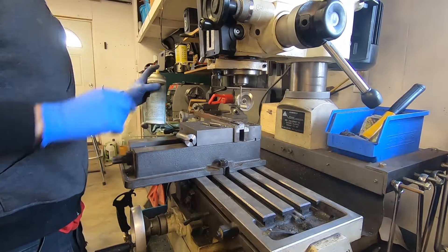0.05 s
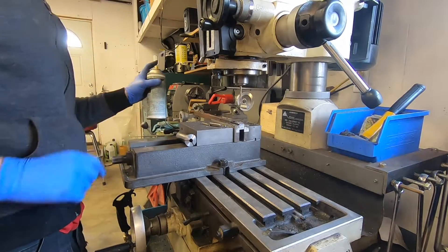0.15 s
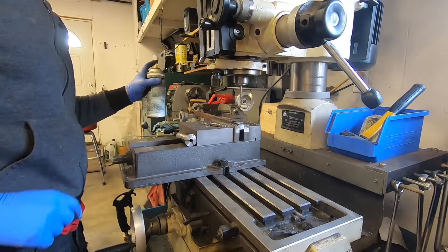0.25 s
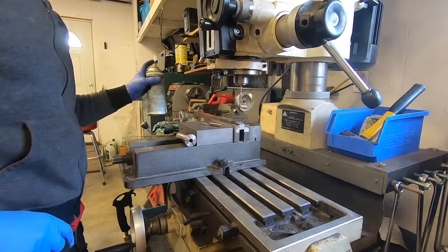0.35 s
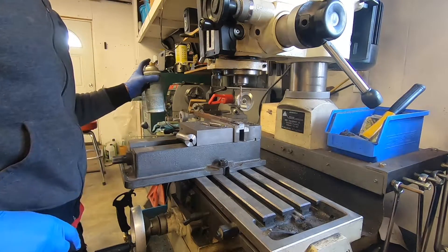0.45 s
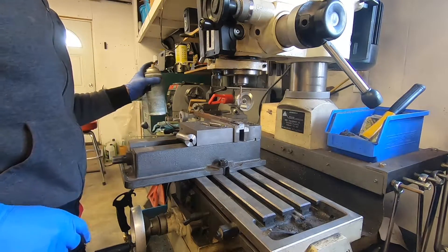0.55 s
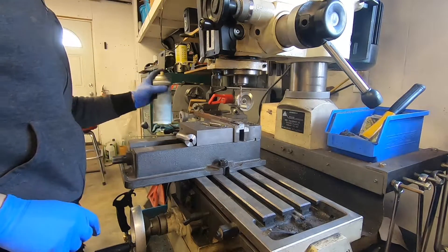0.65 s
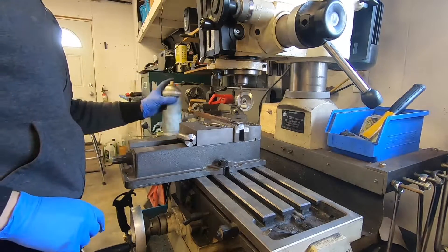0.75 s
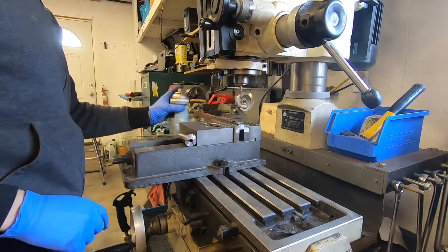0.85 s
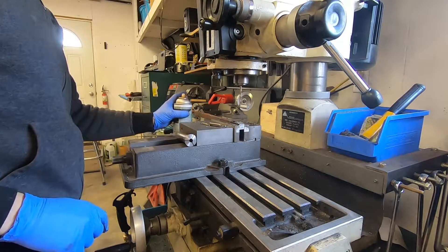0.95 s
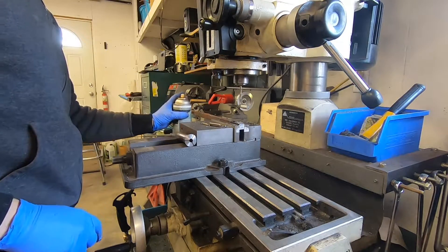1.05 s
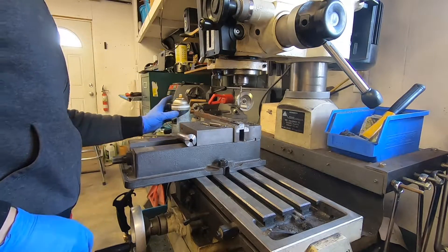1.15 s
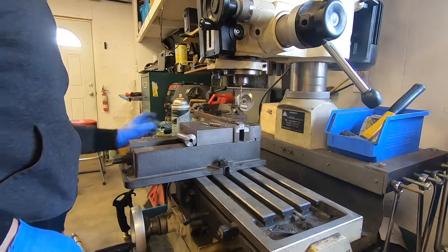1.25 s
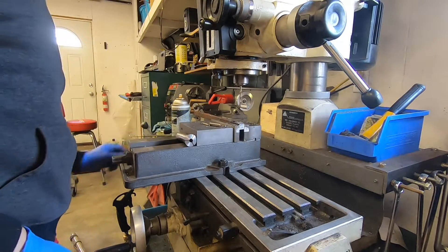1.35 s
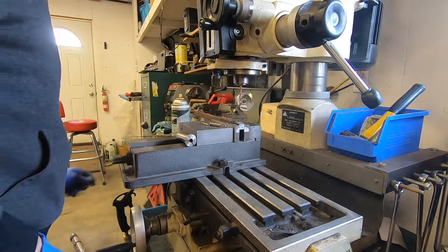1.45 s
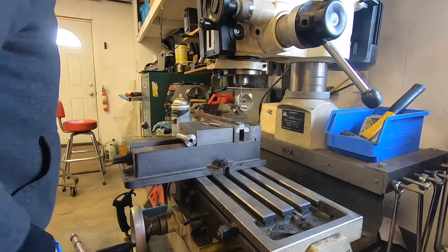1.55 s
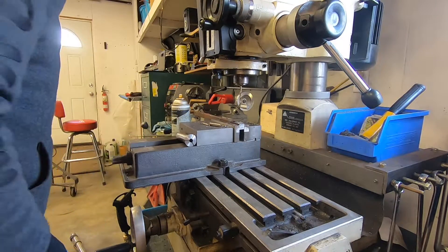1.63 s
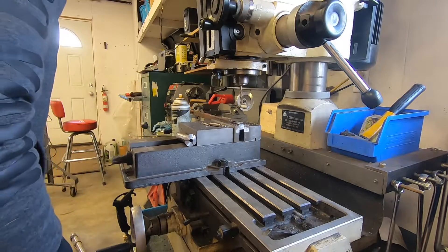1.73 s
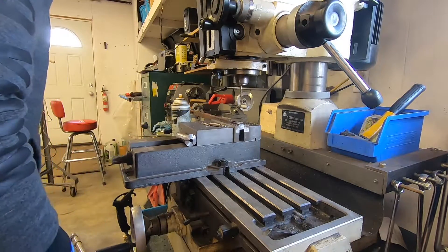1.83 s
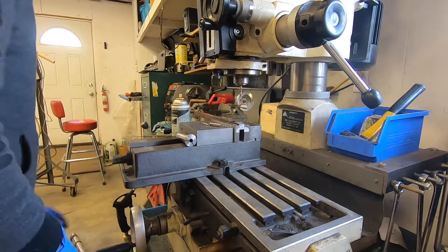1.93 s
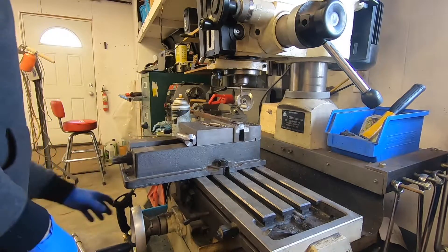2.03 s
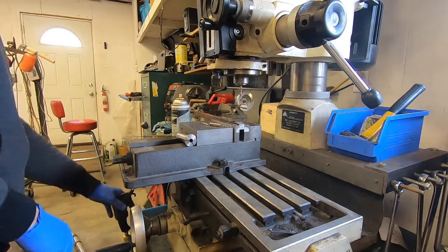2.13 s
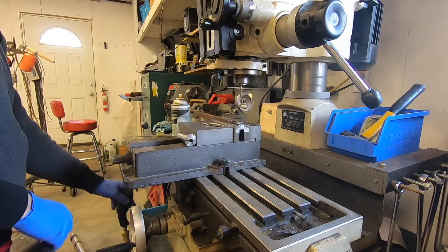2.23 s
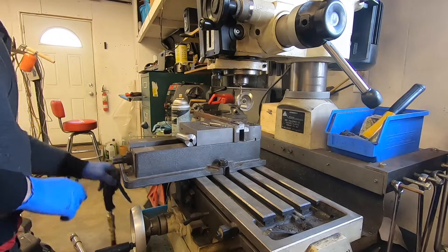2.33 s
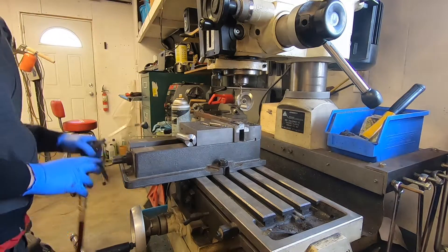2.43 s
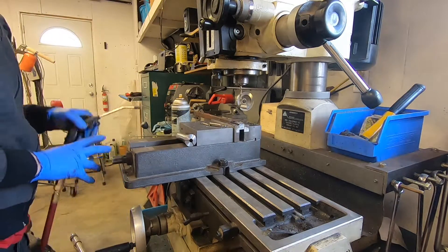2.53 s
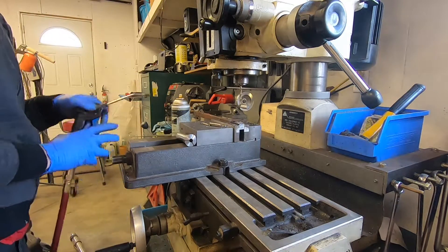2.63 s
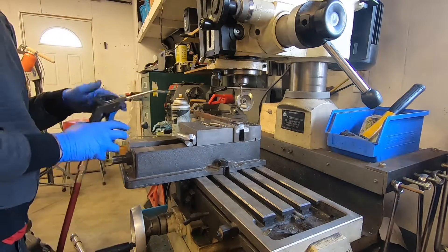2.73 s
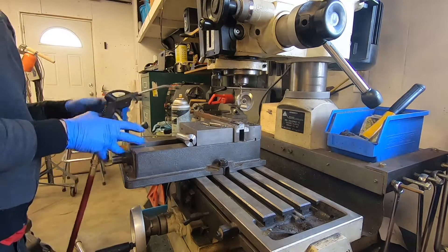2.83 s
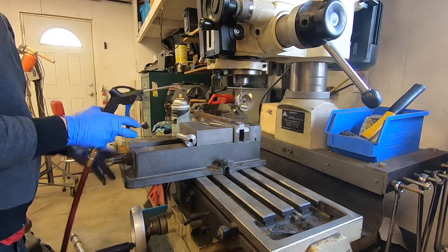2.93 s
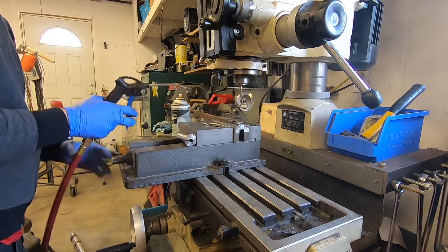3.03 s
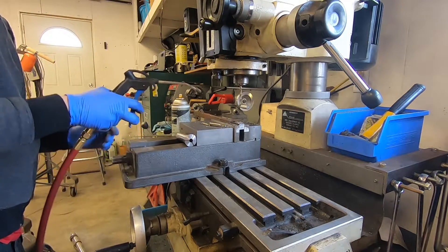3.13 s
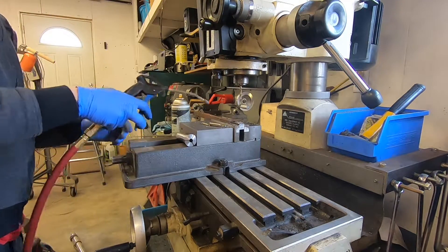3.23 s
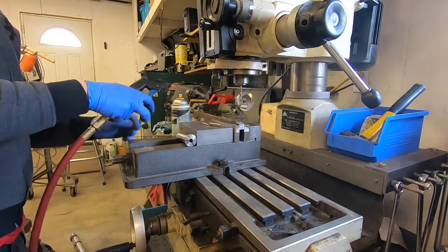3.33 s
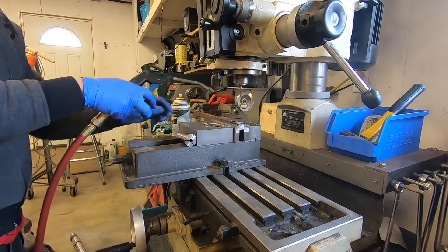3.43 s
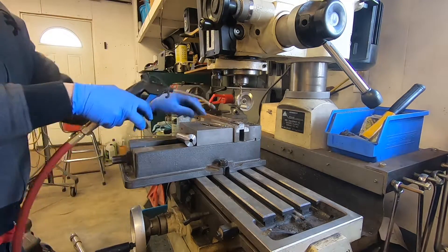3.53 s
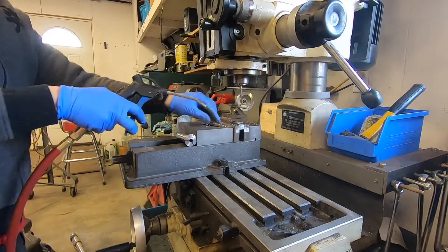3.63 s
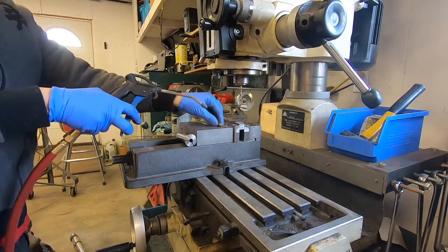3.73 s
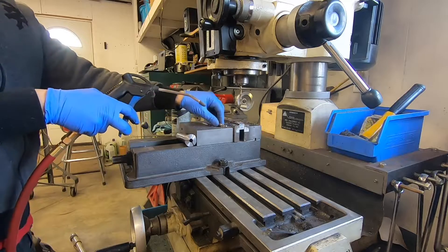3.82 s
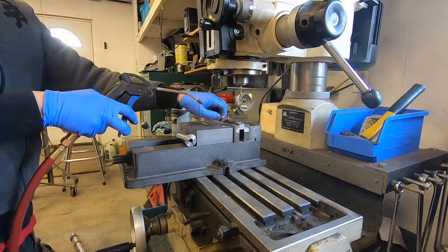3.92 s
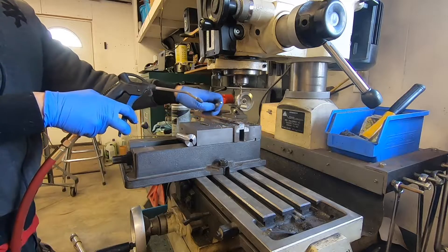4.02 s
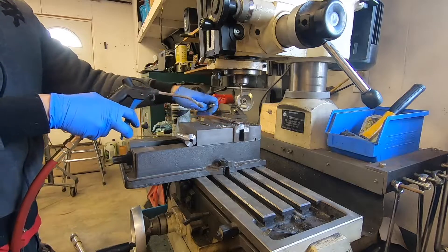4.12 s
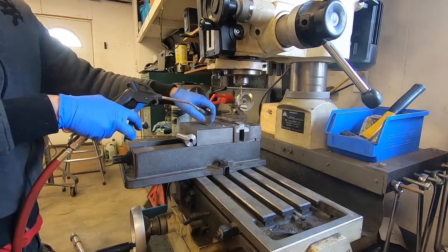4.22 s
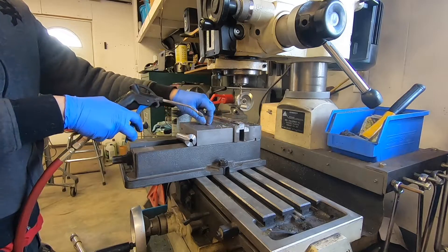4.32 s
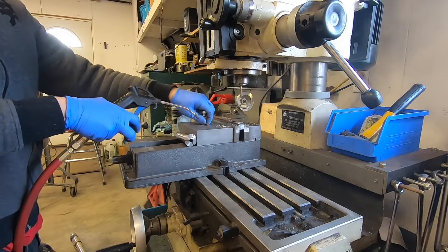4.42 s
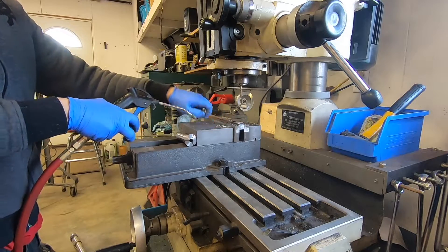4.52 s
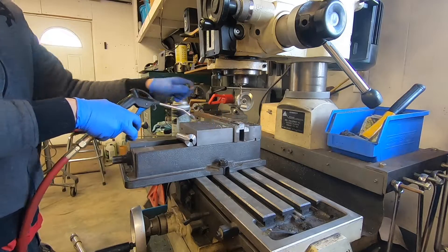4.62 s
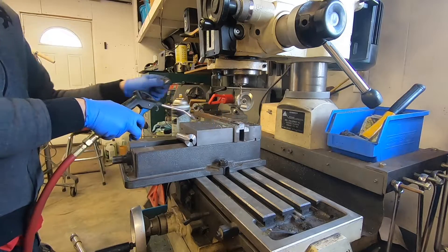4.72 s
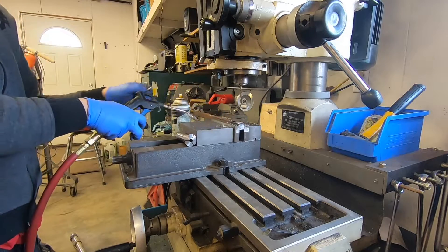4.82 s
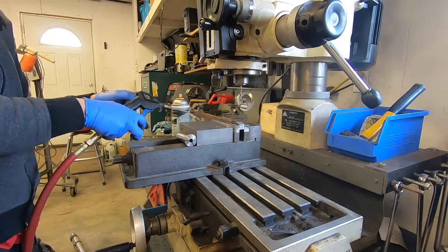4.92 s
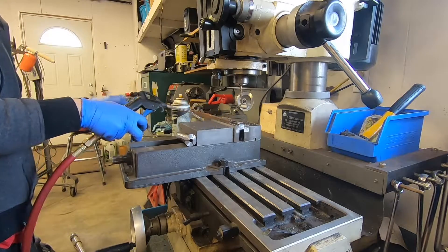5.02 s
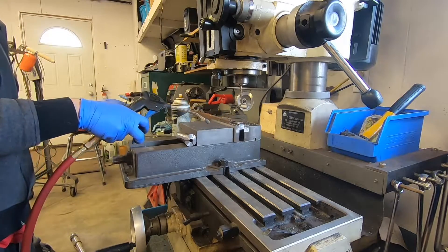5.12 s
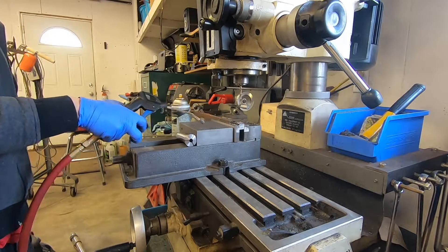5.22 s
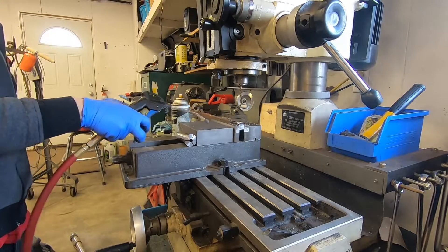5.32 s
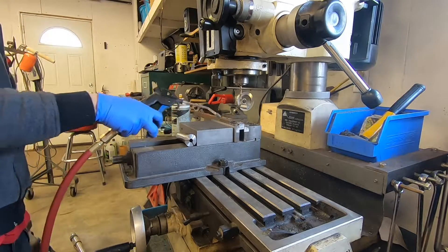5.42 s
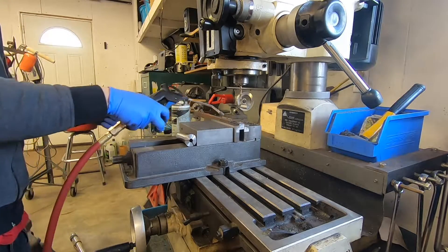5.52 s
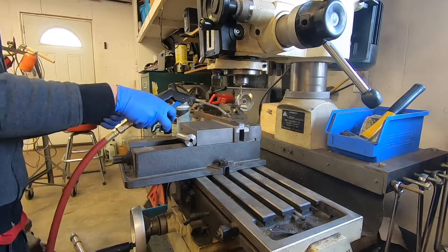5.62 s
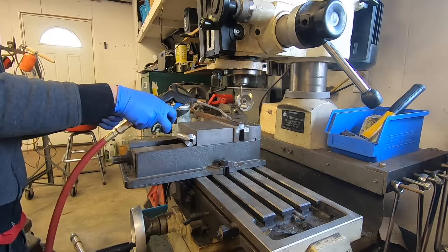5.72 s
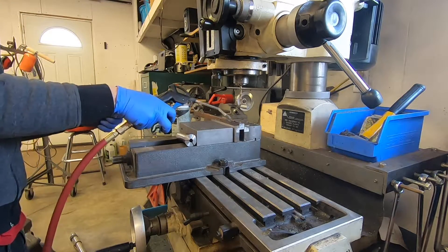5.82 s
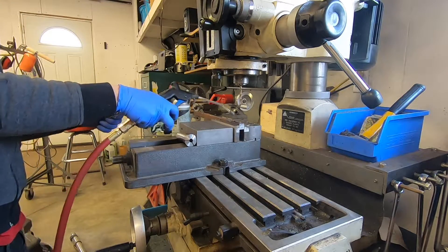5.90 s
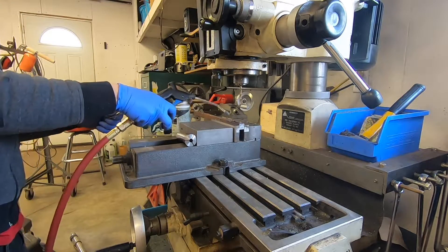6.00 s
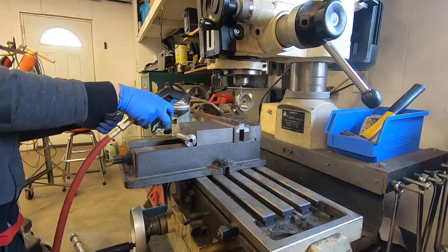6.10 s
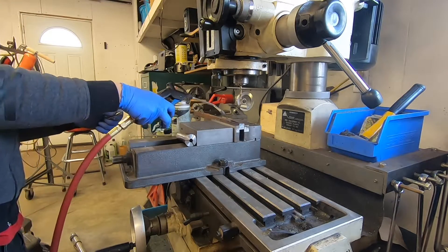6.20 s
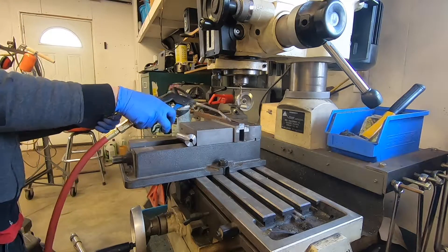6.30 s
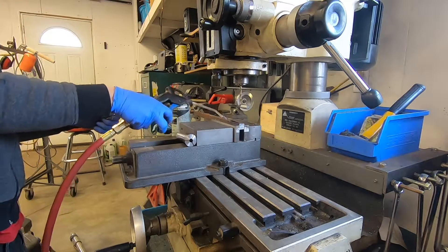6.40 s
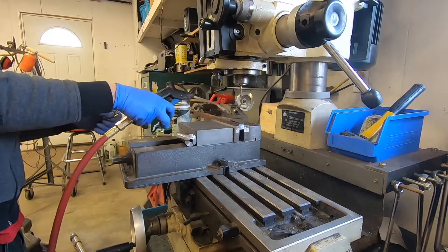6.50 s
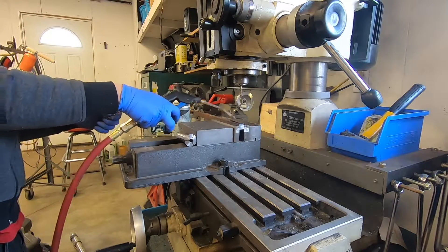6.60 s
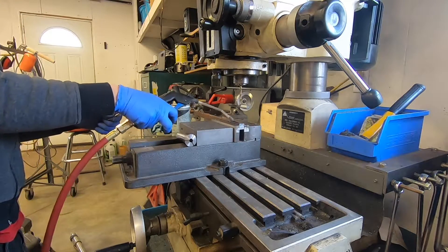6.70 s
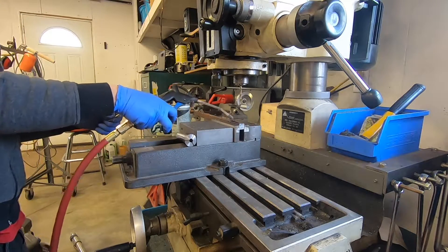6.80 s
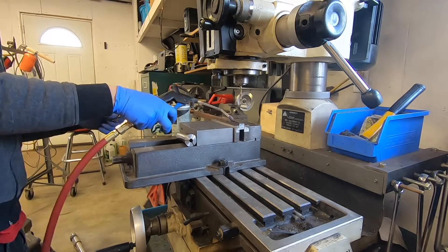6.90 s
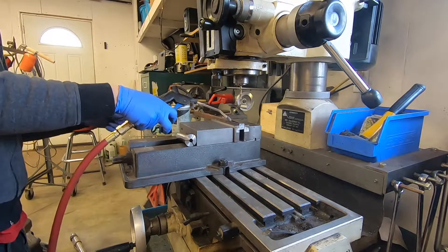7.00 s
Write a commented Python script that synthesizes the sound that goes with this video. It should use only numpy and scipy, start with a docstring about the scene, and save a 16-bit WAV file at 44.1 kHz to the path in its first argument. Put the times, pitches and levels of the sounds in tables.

```python
"""A blow gun puffs once, then blasts chips off the work, close to a small stereo microphone in a machine shop.
Its turbulent jet roars, splashes on metal and makes edges and holes sing. Before that, the low boom
of the stopping mill's frame dies away, a spray can rings as it is tapped and set down on the vise,
shoes shuffle and the gun rattles off its hook. Quiet shop air and a short room tail lie behind."""
import sys
import numpy as np
from scipy import signal
from scipy.fft import rfft, irfft, next_fast_len
from scipy.io import wavfile
from scipy.ndimage import uniform_filter1d, map_coordinates

SR = 44100
rng = np.random.default_rng(int(sys.argv[2]) if len(sys.argv) > 2 else 0)


def file_out(sig):
    """Save sig as 16-bit WAV at sys.argv[1]."""
    # one column per channel
    cols = np.atleast_2d(sig).T
    # limit, then scale
    lim = np.clip(cols, -1, 1)
    pcm = np.round(lim * 32767).astype(np.int16)
    wavfile.write(sys.argv[1], SR, pcm)


N = 310993

# the shop's reverberation (frequency [Hz], t60 [s])
SHOP_DECAY = [(100, 0.99), (700, 0.87), (2000, 0.55), (6000, 0.47), (12000, 0.32)]
# left-right likeness at the microphone (frequency [Hz], correlation [-1..1])
SOURCE_LIKENESS = [(80, 0.5), (300, 0.93), (700, 0.56), (1290, 0.41), (2380, 0.6), (4400, 0.87),
                   (8120, 0.017), (15000, 0.1)]
AIR_LIKENESS = [(60, 0.55), (290, -0.28), (900, -0.77), (3100, 0.7), (6820, -0.35), (15000, -1.1)]
RUMBLE_LIKENESS = [(40, 0.57), (200, 0.9)]
# noise spectra (frequency [Hz], relative density [dB])
SHOP_AIR = [(15, -49.5), (25, -15), (101, -24.5), (169, 1), (274, -12.5), (567, -17), (848, -6),
            (1400, -15), (1750, -22), (2800, -23), (4260, -14.5), (9810, -37), (15500, -50)]
DRIVE_WHIRR = [(120, -28), (200, -5), (420, -17.5), (750, -12.5), (1570, -13.5), (2090, -17), (3320, -17.5),
               (6290, -26.5), (14000, -56)]  # belts and bearings
SOLE_SCRAPE = [(150, -24), (330, -14), (653, -13), (978, -13.5), (1200, -14), (3070, -10.5), (9500, -28),
               (14000, -62.5)]
JET_WASH = [(60, -86), (150, -20), (400, -13.5), (950, -2.5), (1300, -0.5), (2000, -36)]  # spent air sweeping the table
JET_ROAR = [(900, -40), (1400, -8), (2200, -6), (3200, -3), (4300, -7), (6000, -12.5), (9000, -49)]  # the mixing jet
JET_SPLASH = [(2500, -55), (4000, -9), (5100, 2), (6000, 4), (7200, 2), (8200, -1.5), (10000, -31)]  # air hitting metal
NOZZLE_HISS = [(6000, -60.5), (8200, -7), (9500, -4.5), (10000, -6.5), (10700, 0), (12600, -2),
               (13200, 2.5), (15800, -7.5)]
# resonances (frequency [Hz], width [Hz], gain [dB])
LOOSE_PART_MODES = [(50.4, 17, -7.5), (96.5, 25, -7), (215, 162, -15.5)]
HOLLOW_MODES = [(690, 43, 0), (955, 145, 2.5)]
VALVE_SEAT_MODES = [(2760, 70, -1), (3740, 70, 0), (4850, 700, -9)]
TUBE_MODES = [(2940, 240, -2), (3390, 127, -1), (3763, 108, 0), (4490, 160, -4.5), (4900, 170, -1.5),
              (5800, 250, -2.5), (8020, 140, -4), (9430, 250, 0), (9970, 210, -1.5)]  # valve and nozzle tube
# soles, gloves, cloth (start [s], rise [s], level [dB], sag [dB/s], length [s], hollow ring [dB])
SCRAPES = [(0.506, 0.016, -54.5, 62.5, 0.27, -5), (1.367, 0.12, -43, 81, 0.45, 0),
           (1.706, 0.15, -58.5, 72, 0.32, -7), (2.46, 0.013, -61, -12, 0.5, -31.5),
           (3.072, 0.043, -59, -4, 0.23, -19), (3.335, 0.056, -51.5, 56, 0.22, -1.5)]
# body knocks of the spray can as it is tapped and set down, then rattles of hose, hook and tools
# (time [s], peak [dB], centre [Hz], t60 [s])
KNOCKS_AND_RATTLES = [(0.304, -33, 1500, 0.2), (1.066, -23.5, 560, 0.28), (1.087, -23, 1550, 0.16),
                      (1.994, -25.5, 2000, 0.32), (2.29, -52, 1980, 0.095), (2.4125, -37.5, 2800, 0.013),
                      (2.419, -29.5, 2300, 0.033), (2.428, -38.5, 2590, 0.03), (2.458, -37.5, 3160, 0.022),
                      (2.466, -45, 3590, 0.02), (2.617, -35, 2700, 0.0081), (3.052, -36.5, 3480, 0.0663),
                      (3.785, -54, 3900, 0.3), (3.867, -36, 4550, 0.05), (3.876, -35, 4510, 0.021),
                      (3.965, -53, 4400, 0.09), (4.088, -49, 3620, 0.09), (4.237, -50.5, 2600, 0.011),
                      (4.289, -57, 4570, 0.055), (4.441, -65, 6010, 0.11), (4.586, -56, 4300, 0.079)]
# duller handling noises (time [s], peak [dB], centre [Hz], t60 [s])
HOLLOW_KNOCKS = [(1.992, -26, 890, 0.12), (2.05, -30, 680, 0.13), (2.283, -34, 880, 0.08),
                 (3.363, -44, 920, 0.051), (3.397, -41.5, 920, 0.073), (3.452, -44.5, 950, 0.088),
                 (3.772, -57.5, 900, 0.047)]
SOFT_BUMPS = [(2.285, -43, 168, 0.31), (2.468, -50.5, 75, 0.057), (2.293, -51, 480, 0.265),
              (2.902, -30.5, 230, 0.022), (2.914, -47, 304, 0.17), (2.95, -44, 164, 0.12),
              (3.1, -48.5, 75.6, 0.15)]
# small steel parts (time [s], level [dB], pitch [Hz], t60 [s])
STEEL_PINGS = [(2.18, -56, 6350, 0.074), (3.869, -47, 11950, 0.22), (3.869, -54, 2290, 0.18)]
# glove on steel (time [s], level [dB], pitch [Hz])
GLOVE_SQUEAK = [(4.37, -95, 4950), (4.39, -73, 4900), (4.5, -75, 4750), (4.6, -77, 4250), (4.8, -84, 3900),
                (4.85, -100, 3900)]
# blows on the spray can (time [s], level [dB])
FINGER_TAPS = [(0.3025, -13), (0.319, -21), (0.5394, -45)]
CAN_LANDINGS = [(1.0645, -7), (1.086, -10.5), (1.097, -18.5), (1.138, -26.5), (1.222, -22)]
# the can's ring (frequency [Hz], relative level [dB], t60 [s])
HELD_CAN_MODES = [(520, -2, 0.49), (624, -5, 0.52), (752, 6, 0.24), (2535, -8, 0.27), (3330, -8, 0.08),
                  (4270, -12.5, .11), (4690, 2.5, 0.14), (5210, 1.5, .18), (6130, -2.5, 0.21),
                  (8450, -11.5, .1)]
CAN_ON_VISE_MODES = [(154.5, -5.5, 1.9), (228, -11.5, 0.73), (790, 0, 0.22), (944, 0, 0.2),
                     (2305, 10, 0.045), (2470, 0, 0.082), (2650, 11, 0.024), (3680, 2.5, 0.053),
                     (4380, 4, 0.027), (5280, 2.5, 0.02)]
# air past the half-pulled trigger (time [s], level [dB])
TRIGGER_LEAK = [(4.79, -100), (4.805, -61), (4.86, -60), (4.875, -52), (4.885, -100)]
# trigger pulls (open [s], shut [s], ramp [s])
VALVE_OPENINGS = [(2.775, 2.912, .006), (4.864, 7.2, .016)]
# one list for the puff, one for the blast (time [s], drive [dB], extra wash drive [dB])
JET_DRIVE = [
    [(2.785, -30, -16), (2.812, -27.5, -17), (2.824, -23.5, -20.5), (2.855, -26.5, -18),
     (2.898, -37, -16.5), (2.91, -30, -16.5)],
    [(4.89, -29, -21), (5.29, -28.5, -12), (5.41, -30.5, -19.5), (5.49, -29.5, -11), (5.55, -26, -9),
     (5.63, -28.5, -12.5), (5.7, -24.5, -13), (5.76, -27.5, -17.5), (5.83, -24, -15.5), (5.88, -29, -18),
     (6, -25.5, -15), (6.07, -29, -11.5), (6.12, -27, -15.5), (6.31, -29.5, -14), (6.35, -27, -18.5),
     (6.57, -26.5, -18), (6.68, -28, -9.5), (6.71, -25.5, -15), (6.8, -27, -18), (6.93, -27, -12.5),
     (6.96, -33, -13.5), (7.03, -25.5, -15)],
]
# edges and holes singing in the jet (time [s], relative level [dB], pitch [Hz], half-length [s])
EDGE_TONES = [(2.835, -31.5, 4400, 0.02), (2.838, -28, 6940, 0.027), (4.92, -37, 4540, 0.14),
              (5.702, -34, 4500, 0.023), (5.98, -34, 5740, 0.027), (5.539, -39, 1420, 0.059),
              (5.824, -31.5, 8300, 0.025), (6.293, -48.5, 440, 0.06), (6.687, -34, 1500, 0.019),
              (6.703, -32.5, 2720, 0.021), (6.735, -28.5, 8060, 0.014), (6.855, -28, 6300, 0.012),
              (6.858, -27, 8100, 0.011), (6.922, -25, 6350, 0.012), (6.931, -23.5, 8320, 0.01)]
# the microphone's two ports (frequency [Hz], left minus right [dB])
PORT_TILT = [(130, 1.2), (300, 0), (1100, -4), (2900, 0), (5800, -4), (8500, 9), (10000, 13), (11500, 8),
             (15000, 10)]
# its housing shades the top octave (frequency [Hz], gain [dB])
HOUSING_SHADE = [(10000, 0), (10700, -15)]


def amp(db):
    """Decibels to gain."""
    return 10 ** (np.asarray(db) / 20)


def unit(x):
    """Scaled to rms 1."""
    return x / np.sqrt(np.mean(x ** 2) + 1e-20)


def along(points, hz):
    """Interpolate (Hz, value) points on a log axis."""
    f, v = np.transpose(points)
    return np.interp(np.log(hz + 1), np.log(f + 1), v)


def curves(rows):
    """One value per sample for each column after the time."""
    times, *columns = np.transpose(rows)
    return [np.interp(np.arange(N) / SR, times, column) for column in columns]


def wobble(rate):
    """A smooth random curve, rate knots a second."""
    coarse = np.arange(0, N + 32, 32)
    knots = rng.standard_normal(int(N * rate / SR) + 4)
    return np.interp(np.arange(N), coarse, map_coordinates(knots, [coarse * rate / SR]))


def filtered(x, response):
    """Filter x by a complex response of frequency."""
    size = next_fast_len(x.shape[-1] + 8192)
    return irfft(rfft(x, size) * response(np.fft.rfftfreq(size, 1 / SR)), size)[..., :x.shape[-1]]


def modes(table, order=1):
    """Causal response of (Hz, width, dB) resonances, passed order times."""
    return lambda f: sum((-1) ** k * amp(db) * 1j * f * width / (hz * hz - f * f + 1j * f * width)
                         for k, (hz, width, db) in enumerate(table)) ** order


def stereo_noise(size, likeness=SOURCE_LIKENESS):
    """White noise in two partly correlated channels."""
    def mid_side_gains(hz):
        angle = np.arccos(np.clip(along(likeness, hz), -1, 1)) / 2
        return np.array([np.cos(angle), np.sin(angle)])
    mid, side = filtered(rng.standard_normal((2, size)), mid_side_gains)
    return np.array([mid + side, mid - side])


def rush(spectrum, patchy_db, likeness=SOURCE_LIKENESS, size=N):
    """Stereo noise of rms 1 with patches of random gain; it fills the last size samples."""
    bins = signal.stft(stereo_noise(size, likeness), nperseg=512)[2]
    patches = uniform_filter1d(rng.standard_normal(bins.shape[1:]), size=5, axis=0)
    patches = unit(uniform_filter1d(patches, size=10, axis=1))
    noise = signal.istft(bins * amp(patchy_db * patches), nperseg=512)[1][:, :size]
    return np.pad(unit(filtered(noise, lambda hz: amp(along(spectrum, hz)))), ((0, 0), (N - size, 0)))


def add(track, start, sound):
    """Mix a sound in at start seconds."""
    i = round(start * SR)
    track[..., i:i + sound.shape[-1]] += sound[..., :N - i]


def room(sound):
    """The shop's diffuse tail, thin in the bass; the treble dies first."""
    hz, t, bins = signal.stft(stereo_noise(SR // 2), SR, nperseg=256)
    decay = amp(-60 * t / along(SHOP_DECAY, hz)[:, None])
    bass_cut = (hz / (hz + 300))[:, None]
    tail = signal.istft(bins * decay * bass_cut, SR, nperseg=256)[1]
    delayed = np.pad(np.atleast_2d(sound), ((0, 0), (130, 0)))
    return signal.fftconvolve(delayed, tail / np.linalg.norm(tail[0]), axes=1)


def shop_air():
    """Room tone: the quiet shop around the microphone."""
    return amp(-63) * rush(SHOP_AIR, patchy_db=3.5, likeness=AIR_LIKENESS)


def mill_boom(low_hz=76, upper_hz=124.2, halt_s=0.97, whirr_end_s=1.054, jolt_s=1.053, jolt_rise_s=0.16):
    """Two wavering frame modes, rumbling loose parts and the drive's whirr run down with the mill."""
    t = np.arange(N) / SR
    halt_db_per_s = 237

    def frame_gain(db, sag, jolt_db, jolt_sag):
        """Sags in dB/s, drops out as the spindle halts, and swells again as the can lands."""
        running = amp(db - sag * t - halt_db_per_s * np.maximum(t - halt_s, 0))
        jolt = amp(jolt_db - jolt_sag * np.maximum(t - jolt_s - jolt_rise_s, 0))
        return running + jolt * np.clip((t - jolt_s) / jolt_rise_s, 0, 1)

    low, upper = (np.sqrt(2) * np.sin(2 * np.pi * hz * t + 0.36 * wobble(6.7))
                  for hz in (low_hz, upper_hz))
    rumble = unit(filtered(stereo_noise(N, RUMBLE_LIKENESS), modes(LOOSE_PART_MODES, order=2)))
    whirr = unit(filtered(stereo_noise(N), lambda hz: amp(along(DRIVE_WHIRR, hz))))
    whirr_db = -46 - 6.5 * t - halt_db_per_s * np.maximum(t - whirr_end_s, 0) + 2.4 * wobble(30)
    return (frame_gain(-30.5, sag=13, jolt_db=-42, jolt_sag=51) * (low + amp(-3.5) * rumble)
            + frame_gain(-34, sag=15.5, jolt_db=-44.5, jolt_sag=62) * upper + amp(whirr_db) * whirr)


def shuffle(swell_db=16.5, release_db_per_s=199, hollow_db_per_s=58.5):
    """Soles and cloth scrape: each stroke swells, sags and stops, with a hollow ring that fades sooner."""
    out, t = np.zeros((2, N)), np.arange(N) / SR
    scrape = amp(1.5 * wobble(40)) * rush(SOLE_SCRAPE, patchy_db=0.5)
    hollow = unit(filtered(stereo_noise(N), modes(HOLLOW_MODES, order=2)))
    for start, rise, db, sag, length, hollow_db in SCRAPES:
        after = t - start - rise
        level_db = db + np.where(after < 0, swell_db * after / rise, -sag * after)
        level_db -= release_db_per_s * np.maximum(t - start - length, 0)
        ring = amp(hollow_db - hollow_db_per_s * np.maximum(after, 0)) * hollow
        out += amp(level_db) * (scrape + ring)
    return out


def knocks(events, width_ratio, hollow_db, rise_ratio, room_db):
    """Handled objects: noise bursts in one broad resonance each, coloured by a hollow ring."""
    direct, t = np.zeros(N), np.arange(SR // 4) / SR
    hollow = modes(HOLLOW_MODES, order=2)
    for start, db, hz, t60 in events:
        burst = rng.standard_normal(len(t)) * amp(-60 * t / t60) * (1 - np.exp(-t / (rise_ratio * t60)))
        body = modes([(hz, width_ratio * hz, 0)], order=3)
        knock = filtered(burst, lambda f: body(f) * (1 + amp(hollow_db) * hollow(f)))
        add(direct, start, amp(db) * knock / np.abs(knock).max())
    return direct + amp(room_db) * room(direct)[:, :N]


def steel_pings():
    """Small steel parts ring in flickering, dying tones."""
    out, t = np.zeros(N), np.arange(SR // 4) / SR
    for start, db, hz, t60 in STEEL_PINGS:
        envelope = amp(db - 60 * t / t60 + 7 * wobble(400)[:len(t)]) * (1 - np.exp(-t / .003))
        add(out, start, envelope * np.sin(2 * np.pi * hz * t))
    return out


def glove_squeak():
    """A glove rubs on steel: a faint, unsteady, falling tone."""
    db, hz = curves(GLOVE_SQUEAK)
    return amp(db + 5 * wobble(70)) * np.sin(2 * np.pi * np.cumsum(hz + 90 * wobble(250)) / SR)


def spray_can(blows, can_modes, crack_hz, width_hz, crack_t60, rise_s, ring_db, room_db):
    """Each blow rings the can's modes over a short crack of noise."""
    out, t = np.zeros((2, N)), np.arange(SR) / SR

    def beating(hz):
        """The unsteady gain of a cluster of close modes."""
        drift = map_coordinates(rng.standard_normal(SR // 200), [t[::10] * 2 * hz ** .5])
        return np.repeat(np.cos(1.4 * drift), 10)

    for start, db in blows:
        ring = amp(ring_db) * sum(amp(level - 60 * t / t60) * beating(hz) * np.sin(2 * np.pi * hz * t)
                                  for hz, level, t60 in can_modes)
        burst = rng.standard_normal(SR) * amp(-60 * t / crack_t60) * (1 - np.exp(-t / rise_s))
        crack = filtered(burst, modes([(crack_hz, width_hz, 0)], order=3))
        add(out, start, amp(db) * (crack + ring * (1 - np.exp(-t / 0.00074))))
        add(out, start, amp(db + room_db) * room(crack + ring * amp(-60 * t / 0.19)))
    return out


def air_jet(usual_wash_db=-14.5, hiss_follows=0.13, hiss_shade=0.62):
    """Four bands of turbulence, coloured by tube resonances that come and go."""
    flutter_db = 0.89 * wobble(25)  # hand and eddies shake all bands together
    drive_db, wash_db = curves(JET_DRIVE[0] + JET_DRIVE[1])
    hiss_db = drive_db.mean() + hiss_follows * (drive_db - drive_db.mean())
    hiss_db -= hiss_shade * (wash_db - usual_wash_db)  # turned into the work: more wash, less hiss
    bands = ((JET_WASH, drive_db + wash_db - 4), (JET_ROAR, drive_db - 4.5),
             (JET_SPLASH, drive_db - 4.5), (NOZZLE_HISS, hiss_db + 0.5))
    size = N - int(VALVE_OPENINGS[0][0] * SR)
    jet = sum(amp(db + flutter_db + 0.63 * wobble(60)) * rush(spectrum, patchy_db=2, size=size)
              for spectrum, db in bands)
    tube = sum(amp(-2 + 0.6 * wobble(8.2)) * filtered(jet, lambda f: np.abs(modes(half)(f)) ** 2)
               for half in (TUBE_MODES[::2], TUBE_MODES[1::2]))
    return 0.81 * jet + tube


def edge_tones(width_at_1khz=330):
    """Edges and holes sing briefly as the jet sweeps over them."""
    out, t = np.zeros((2, N)), np.arange(-SR // 5, SR // 5) / SR
    for centre_s, db, hz, half_length in EDGE_TONES:
        resonance = modes([(hz, width_at_1khz * np.sqrt(hz / 1000), 0)], order=2)
        tone = unit(filtered(stereo_noise(len(t)), resonance))
        add(out, centre_s + t[0], amp(db) * np.exp(-(t / half_length) ** 2) * tone)
    return out


def blow_gun():
    """Close up, the valve gates the jet; barely open before the blast, its seat whistles."""
    t = np.arange(N) / SR
    valve = sum(np.clip((t - opens) / ramp, 0, 1) ** 2 * np.clip((shuts - t) / ramp, 0, 1)
                for opens, shuts, ramp in VALVE_OPENINGS)
    jet = valve * (air_jet() + edge_tones())
    leak = amp(curves(TRIGGER_LEAK)[0]) * unit(filtered(stereo_noise(N), modes(VALVE_SEAT_MODES)))
    return amp(1.5) * jet + leak + amp(-6) * room(jet[:1])[:, :N]


def scene():
    """The shop as it sounds from beside the mill."""
    taps = spray_can(FINGER_TAPS, HELD_CAN_MODES, crack_hz=5500, width_hz=9000,
                     crack_t60=.075, rise_s=.003, ring_db=-14.5, room_db=-3.5)
    landing = spray_can(CAN_LANDINGS, CAN_ON_VISE_MODES, crack_hz=1900, width_hz=3600,
                        crack_t60=.012, rise_s=.0004, ring_db=-19.5, room_db=-6)
    background = shop_air() + mill_boom()
    handling = (knocks(KNOCKS_AND_RATTLES, width_ratio=1.6, hollow_db=-28.5, rise_ratio=.025, room_db=-1.5)
                + knocks(HOLLOW_KNOCKS, width_ratio=2, hollow_db=5, rise_ratio=2.5, room_db=-16)
                + knocks(SOFT_BUMPS, width_ratio=1, hollow_db=-39, rise_ratio=1.2, room_db=-4.5))
    return background + handling + steel_pings() + glove_squeak() + shuffle() + taps + landing + blow_gun()


def record(dry):
    """The microphone: its ports tilt left against right, its housing shades the top octave."""
    band_limit_hz = 15900

    def response(hz):
        tilt_db = np.outer([.5, -.5], along(PORT_TILT, hz))
        return amp(tilt_db + along(HOUSING_SHADE, hz)) * (hz < band_limit_hz)
    return filtered(dry, response)


dry = scene()
out = record(dry)
file_out(out)
```